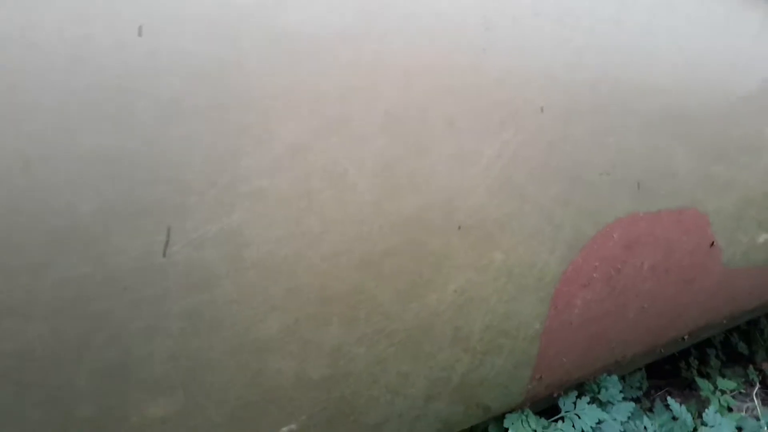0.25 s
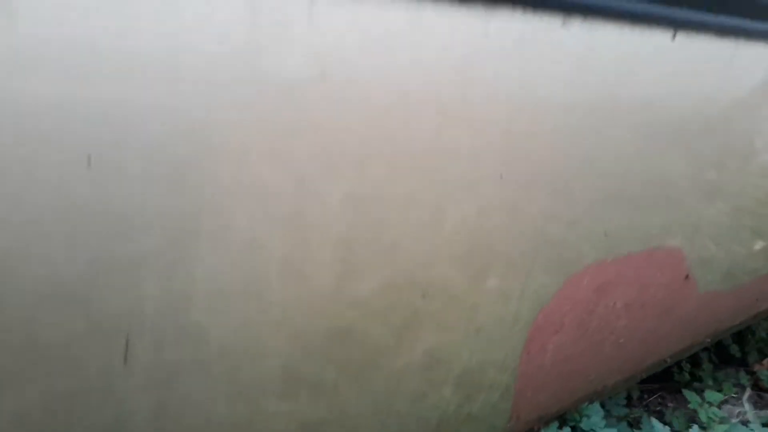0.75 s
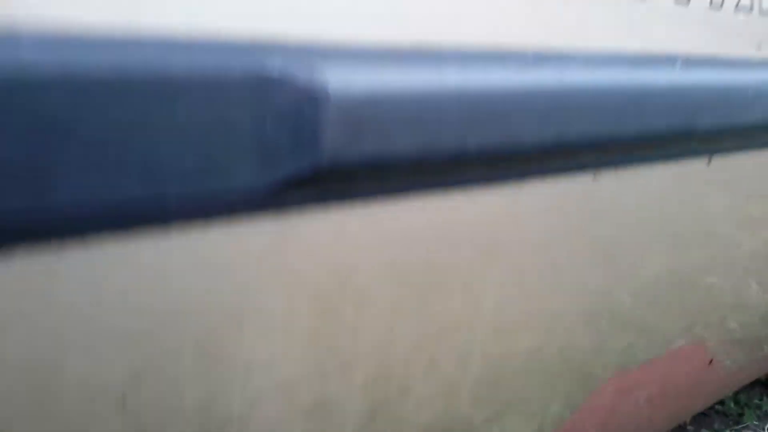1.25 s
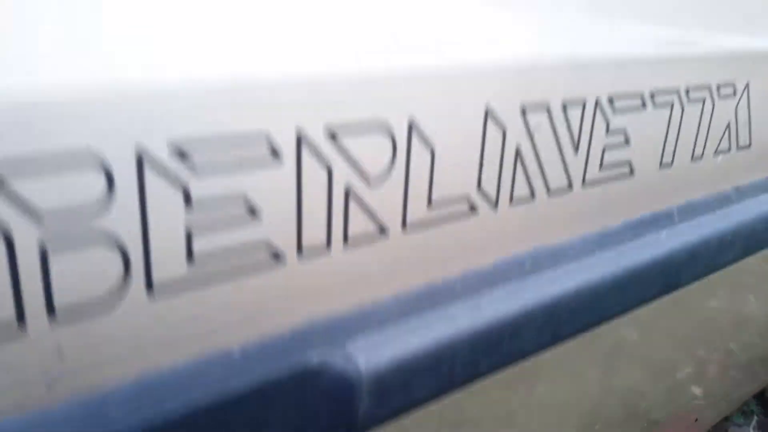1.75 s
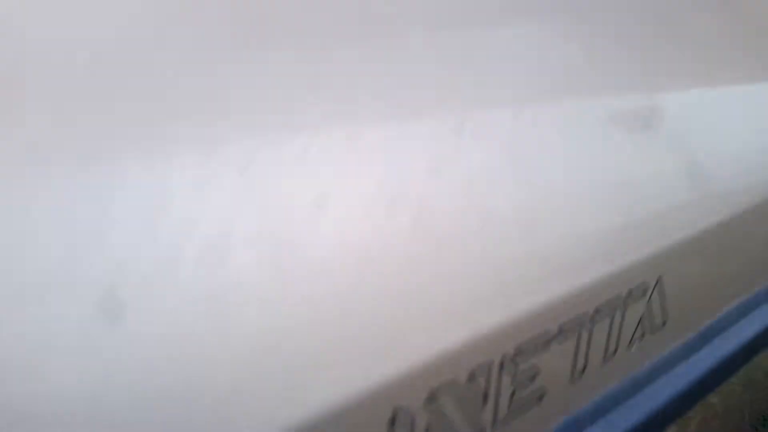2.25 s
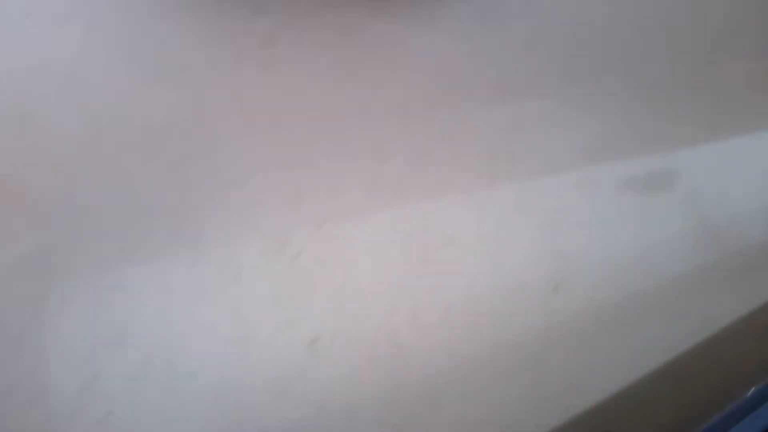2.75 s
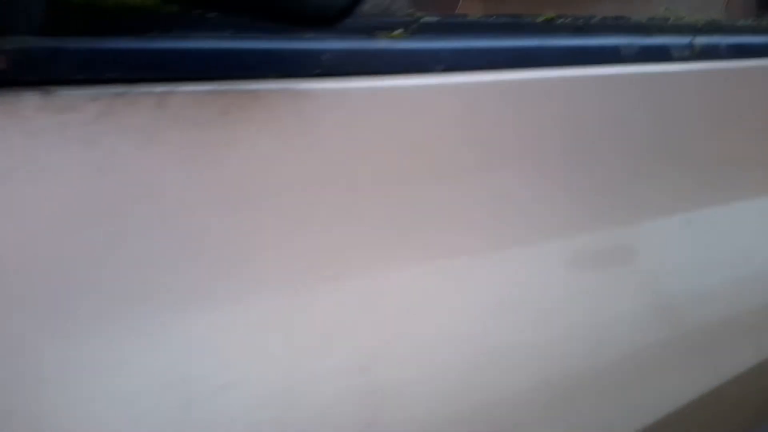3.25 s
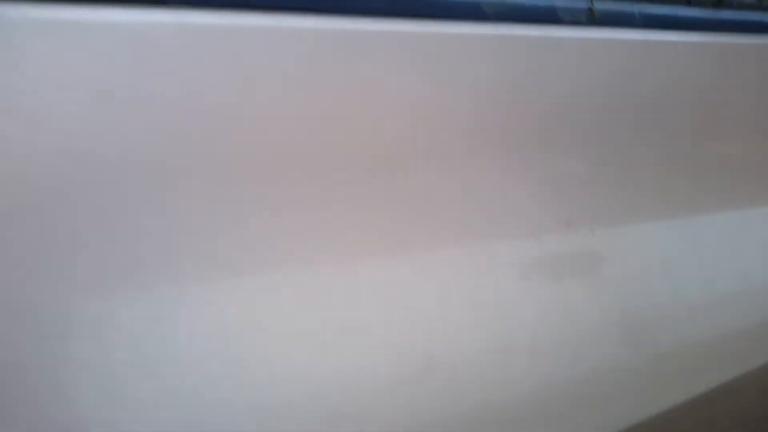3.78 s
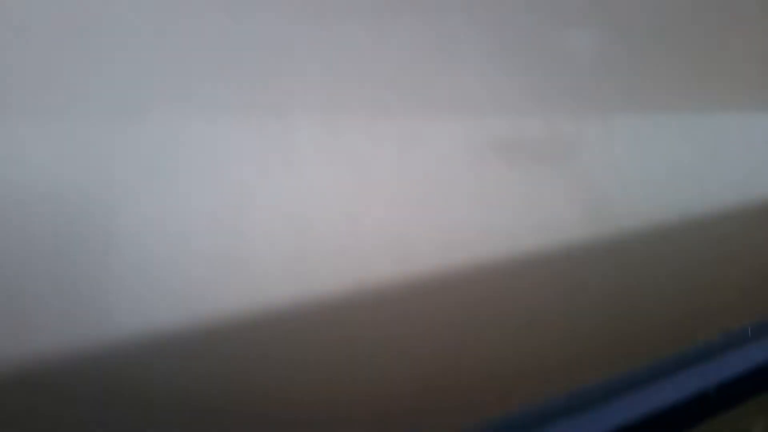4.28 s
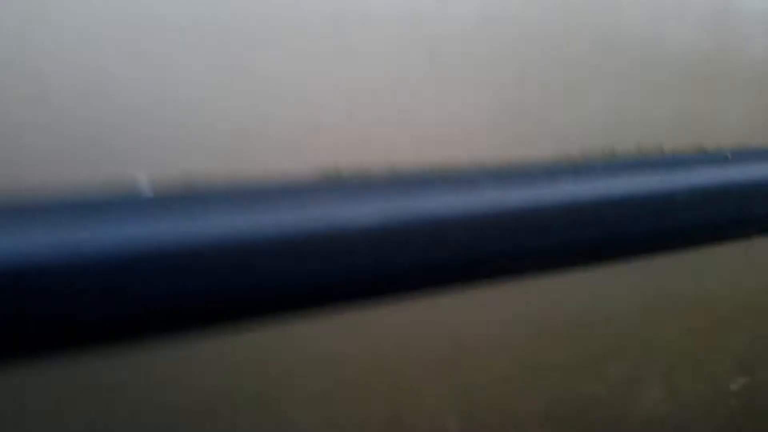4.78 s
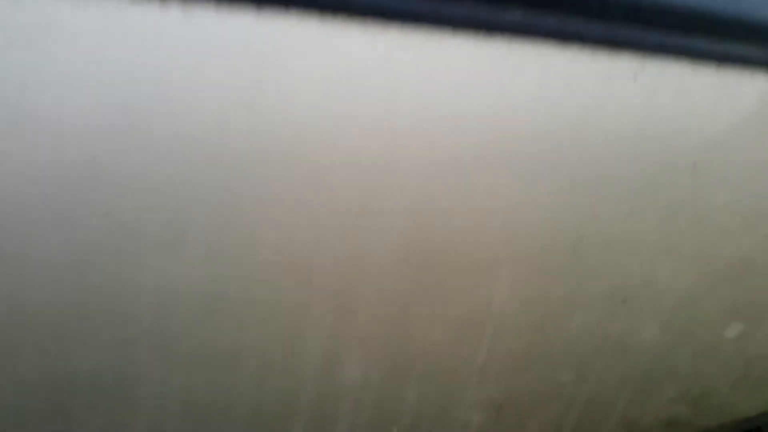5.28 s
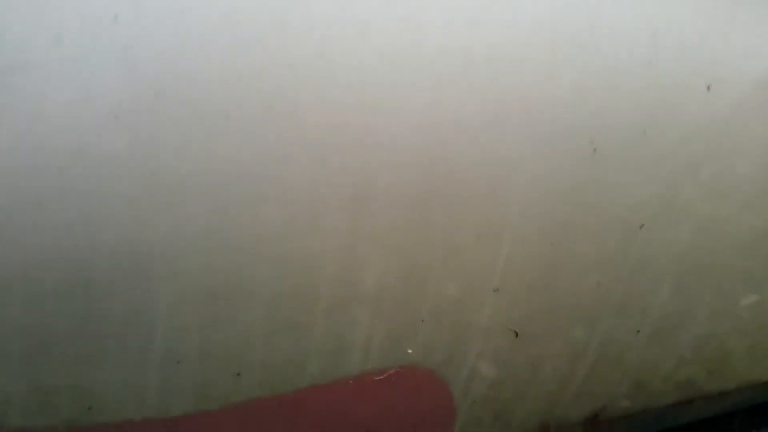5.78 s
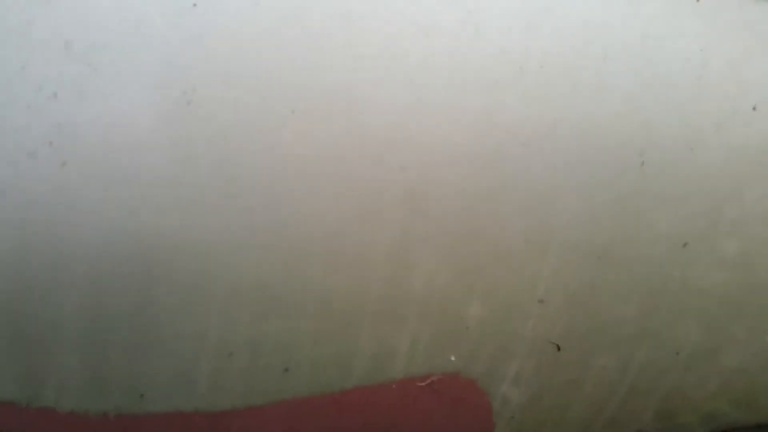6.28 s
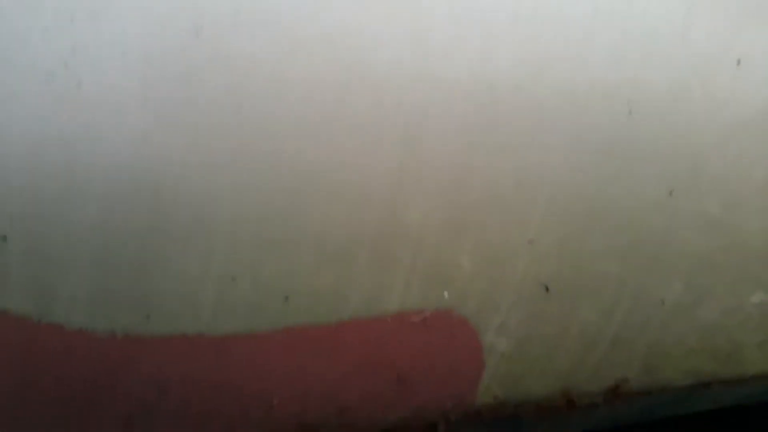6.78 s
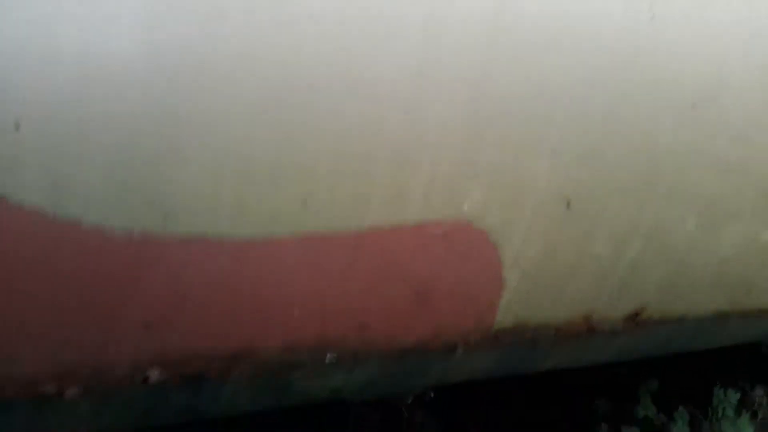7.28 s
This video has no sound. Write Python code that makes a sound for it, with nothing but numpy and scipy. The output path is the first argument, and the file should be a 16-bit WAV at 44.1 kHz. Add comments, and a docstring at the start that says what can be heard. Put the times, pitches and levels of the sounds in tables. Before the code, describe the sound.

Dry leaves crackle and twigs snap under someone's shifting feet outdoors, with one dense, loud crunch after the middle and quiet at both ends.

```python
"""Dry leaf litter crackles under someone's shifting feet, heard through a phone with one microphone.
The leaves are thousands of tiny noise bursts; each snapping twig is a sharp click with fading splinters.
Soles scuff the soil: lumpy noise through resonances, plus single thuds; a low rumble comes and goes.
Behind them are a shaped noise of distant traffic and hiss and a thin electronic tone.
The microphone port lifts the leaves and snaps near 4.7 kHz."""
import sys
import numpy as np
from scipy import signal
from scipy.fft import rfft, irfft
from scipy.io import wavfile
from scipy.ndimage import uniform_filter1d

SR = 44100
rng = np.random.default_rng(int(sys.argv[2]) if len(sys.argv) > 2 else 0)


def dump_mix(stems):
    """Bounce the given channels to the path in sys.argv[1] as a 16-bit WAV at rate SR."""
    frames = np.atleast_2d(stems).T  # one column per channel
    limited = np.clip(frames, -1, 1)  # hard clip at full scale
    pcm = np.round(limited * 32767).astype(np.int16)
    wavfile.write(sys.argv[1], SR, pcm)


N = 332073  # length in samples, about 7.5 s


def leaves(crackle_db, crisp_db, stems_db):
    """Leaves break as dense, patchy grains; all sizes break together, each with its own level."""
    patch = undb(0.82 * walk(40) + 1.4 * walk(90))
    crackle = patch * grains(450., 3.8, 0.0012, 2.9)
    body, middle, top = sizes(crackle)
    stems = unit(body) * undb(stems_db + 1.3 * walk(30))
    crisp_edges = unit(top) * undb(crisp_db + 0.76 * walk(30))
    return stems + unit(middle) * undb(crackle_db) + crisp_edges


def crushes(column):
    """A sole or toe crushes a patch: loudness climbs and drops in dB; the power of all crushes adds up."""
    # crushed patches: peak time [t/s], crackle [level/dB], rise [t/s], fall [t/s],
    # crisp edges relative to crackle [level/dB], soil relative to crackle [level/dB]
    crush_rows = [(1.24, -61, 0.17, .1, -7, -5), (1.545, -47.5, 0.058, 0.089, -7, -30),
                  (1.65, -47, 0.062, 0.094, -1, -27), (1.815, -63, .04, .05, 17, -8),
                  (1.99, -46, 0.038, 0.076, -10, -12), (2.11, -41.5, 0.069, 0.039, -6, -18),
                  (2.235, -39, .03, .2, -6.5, -13), (2.3, -30.5, 0.096, 0.19, -12, -19.5),
                  (2.39, -46.5, 0.06, .15, 0, -7), (2.531, -32.5, 0.16, 0.084, -9, -15.5),
                  (2.759, -50, 0.051, 0.26, -5, -7.5), (3.06, -47.5, .15, 0.057, -11, -7),
                  (3.23, -41.5, 0.12, 0.039, -8, -15), (3.36, -49.5, .15, .12, -14, -7),
                  (3.67, -41, 0.16, 0.54, -10.5, -16), (3.99, -44.5, 0.13, 0.3, -9, -13.5),
                  (4.491, -44.5, 0.15, .1, -11, -16), (4.545, -37.5, 0.061, 0.22, -6.5, -14),
                  (4.592, -28.5, 0.058, 0.14, -9.5, -11.5), (4.66, -27, 0.062, 0.13, -9.5, -26),
                  (4.757, -22, 0.14, 0.083, -9, -19), (4.84, -33.5, 0.035, 0.23, -12, -17),
                  (4.94, -44.5, 0.044, 0.11, 0.5, 0), (5.059, -39.5, 0.067, 0.021, -10, -5),
                  (5.22, -40, 0.012, 0.12, -7, -2.5), (5.268, -53.5, 0.079, 0.06, -1, 9),
                  (5.37, -48, 0.17, 0.076, -9, -9), (5.52, -49.5, 0.071, 0.09, -3, -19),
                  (5.61, -39, 0.048, 0.092, -10, -6), (5.68, -48.5, 0.12, 0.078, -7, 5),
                  (5.97, -43.5, 0.043, 0.09, -9, -10.5), (6.57, -61, 0.055, 0.044, -14, -19),
                  (6.94, -60.5, 0.17, 0.053, -12, -19), (7.09, -50, 0.081, 0.09, -7.5, -13),
                  (7.283, -44, 0.012, 0.092, -7, -3.5), (7.41, -55, 0.085, 0.15, -5.5, -7)]
    swell_db = 20  # climb within the rise time, drop within the fall time
    t = np.arange(N) / SR
    power = np.zeros(N)
    for row in crush_rows:
        s, db, rise, fall = row[:4]
        shift_db = row[column] if column else 0  # column 0 means the plain crackle
        before = (s - t) / max(rise, .005)
        after = (t - s) / max(fall, .005)
        away = np.where(t < s, before, after)
        power += undb(db + shift_db - swell_db * np.minimum(away, 6)) ** 2
    return power


def grains(rate, spread_db, tail_s, bed):
    """Random breaks of uneven size (rate per s), noise that starts sharply and dies fast, over a soft bed."""
    chance = rng.random(N)
    big = rng.exponential(size=N)
    hits = (chance < rate / SR) * undb(spread_db * np.minimum(big, 5.))
    swell = signal.lfilter([1], [1, -np.exp(-1 / (tail_s * SR))], hits)
    return unit((unit(swell) + bed) * rng.standard_normal(N))


def sizes(x):
    """Small pieces sound higher: split into body, middle and crisp top, as heard through the port."""
    body_hz, crisp_hz, thin_hz = 2780, 8000, 11800  # two borders; the top thins out above the last
    f = np.fft.rfftfreq(len(x), 1 / SR)
    low = 1 / (1 + (f / body_hz) ** 6)
    high = 1 - 1 / (1 + (f / crisp_hz) ** 8)
    floor = 1 - 1 / (1 + (f / 790.0) ** 4)  # takes the bass out of the body
    roof = 1 / np.sqrt(1 + (f / thin_hz) ** 2)
    spectrum = rfft(port(x))
    shares = (low * floor, 1 - low - high, high * roof)
    return (irfft(spectrum * share, len(x)) for share in shares)


def port(x):
    """The small tube in front of the microphone resonates."""
    port_hz, width_hz, lift_db = 4700, 1020, 15
    b, a = signal.iirpeak(port_hz, port_hz / width_hz, SR)
    return x + undb(lift_db) * signal.lfilter(b, a, x)


def twigs():
    """Twigs and leaves snap at set moments."""
    # snaps: time [t/s], peak of the middle part [level/dB], body relative to it [level/dB],
    # crisp top relative to it [level/dB], splinter peaks relative to the break [level/dB]
    snap_rows = [(0.3861, -44, -25, -12, -22), (0.584, -54, -1, 1, -3), (0.8896, -55, -12, -17, -19),
                 (0.9778, -51, -25, -11, -9), (1.479, -41.5, -7, 0, -8), (1.5121, -35, -22, -2, -15),
                 (1.5929, -30.5, -30, -15, -10), (1.7867, -33.5, -21, 12, -27), (1.8066, -36, -24, 9, -12),
                 (1.823, -47, -22, 4, -20), (1.8351, -33.5, -33, 7, -30), (1.9299, -42, -16, -4, -18),
                 (1.9842, -31.5, -24, -2, -2), (2.102, -29.5, -11, -10, 2), (2.1182, -26, -13, -12, -18),
                 (2.169, -29.5, -7, 1, -9.5), (2.221, -26, -5.5, -1, -10), (2.48, -28.5, -20, -4, -4),
                 (2.5258, -23.5, -25, -10, -5), (2.6438, -21, -12, 2, -18), (2.7437, -20.5, -11, -6, -16),
                 (2.7662, -26.5, -9, -9, -18), (2.8031, -32, -8, -15, -9), (2.8926, -32.5, -17, -18, -4),
                 (2.9105, -29, -11, -26, -22), (2.9929, -28.5, -2.5, 0, -18), (3.1363, -5, -29, -4, -22),
                 (3.235, -21, -26, -3, -15), (3.6435, -25.5, -21, -12, -27), (3.6684, -28, -23, -16, -17),
                 (3.7931, -31.5, -8, -16, -11), (3.87, -34.5, -15, -3, -7), (3.936, -36, -16, 1, -6),
                 (3.962, -27, -29, -8, -25), (4.001, -23.5, -34, -22, -34), (4.065, -24.5, -22, -19, -29),
                 (4.1413, -29, -16, 2, -25), (4.3786, -44, -33, -9, -30), (4.538, -31, -30, -10, -12),
                 (4.588, -11.5, -12, -19, -24), (4.6665, -14, -13.5, -22, 4), (4.7527, -8, -36, -27, -1),
                 (4.9336, -17, -13, -12, -21), (4.941, -17, -8.5, -16, -15), (4.9674, -22.5, -9, -4, -14.5),
                 (5.0463, -27, -18, 1, -16), (5.1317, -34, -2, -9, -8), (5.1506, -31.5, -7, -13, -13),
                 (5.1714, -33, -16, -31, -5), (5.2096, -25.5, -5, 4.5, -6), (5.2178, -25, -30, 3, -15),
                 (5.2306, -23.5, -8, -30, -20), (5.443, -32, -19.5, -11, -24), (5.5137, -41, -5, 8, -9),
                 (5.579, -33, -10, 4, -10), (5.595, -17, -17, 4.5, -10.5), (5.7452, -31, -10, 6, -15),
                 (5.9564, -25, -10, -8, -4), (5.9624, -25.5, -9, -12, -4.5), (6.0156, -27, -9, -6, -14),
                 (6.0344, -39, -2, 1, -15), (6.2158, -38, -31, -1, -14), (6.2782, -45.5, -7, 4, -22),
                 (6.3683, -54, -16, -22, -16), (6.4061, -49.5, -10, -5, -6), (6.5236, -46, -12, -15, -9),
                 (6.8148, -39, -6, -5, -10), (6.8671, -45, -16, -13, -14), (6.9588, -39, -14, -35, -17),
                 (7.0188, -33, -27, 3.5, -20), (7.0797, -37, -15, -14, -10), (7.1031, -31, -26, -24, -25),
                 (7.1502, -36.5, -18, -13, -22), (7.2256, -39.5, -10, -20, -11),
                 (7.28, -16.5, -7.5, -6.5, -11), (7.2861, -18, -24, 2, -31), (7.3, -29, -27, -6, -8),
                 (7.321, -25.5, -24, -22, -37), (7.355, -33, -14, -16, -29), (7.3846, -30.5, -7, -20, -24),
                 (7.4207, -41.5, -10, 6, -8)]
    return snaps(snap_rows)


def ticks(stir_db):
    """Small breaks at random moments, louder when the stir around them is louder."""
    ticks_per_s, scatter_db = 7, 4.5
    mean_db = [12, -41, -14, -4]  # peak relative to the stir, then body, top and splinters as for twigs
    chance = rng.standard_normal((int(ticks_per_s * N / SR), 4))
    s = .01 + rng.random(len(chance)) * (N / SR - .02)
    rows = np.column_stack([s, mean_db + scatter_db * chance])
    rows[:, 1] += stir_db[(s * SR).astype(int)]
    return snaps(rows)


def snaps(rows):
    """Each snap is a sharp break, one single click, then a hiss of splinters that fades."""
    splinter_t60_s = 0.032  # time to fade by 60 dB
    crest_db = 5  # peaks of the splinter hiss over its rms
    lead = 64  # samples of room ahead of the break
    out = np.zeros(N + SR)
    t = np.arange(4096) / SR
    noise = rng.standard_normal((len(rows), len(t)))
    fade = np.exp(-np.log(1000) * t / splinter_t60_s)
    for (s, peak_db, body_db, top_db, splinter_db), hiss in zip(rows, noise):
        burst = undb(splinter_db - crest_db) * hiss * fade
        burst[0] += 1  # the break itself
        body, middle, top = sizes(np.roll(burst, lead))
        middle = band(middle, 3100.0, 8400.0, order=1)  # the broken piece flexes for a few cycles
        body, middle, top = (part / np.abs(part).max() for part in (body, middle, top))
        i = int(s * SR) - lead
        out[i:i + len(t)] += undb(peak_db) * (middle + undb(body_db) * body + undb(top_db) * top)
    return out[:N]


def soles(scuff_db, rumble_db):
    """Lumpy scuffing of the soil and a few single thuds, over a low rumble that comes and goes."""
    # hollow litter rings when scuffed: resonance [f/Hz], width [f/Hz], strength [level/dB]
    soil_peaks = [(355, 260, 1.5), (548, 220, -1), (786, 180, -2), (1124, 66, -16)]
    # low rumble: resonance [f/Hz], width [f/Hz], strength [level/dB]
    rumble_peaks = [(68, 16, -1.5), (95.5, 66, 3.5), (156, 42, -10), (185, 49, -11)]
    # heel and toe thuds: time [t/s], peak before the bass cut [level/dB], pitch [f/Hz], 60 dB fade [t/s]
    thud_rows = [(2.087, -44, 98, 0.086), (2.192, -36.5, 173, 0.046), (2.236, -40.5, 553, 0.1),
                 (2.366, -40, 231, 0.17), (2.399, -35, 260, 0.032), (2.542, -41, 208, 0.099),
                 (2.645, -38, 203, 0.053), (4.586, -22.5, 250, 0.036), (4.59, -30, 105, 0.06),
                 (4.643, -36, 179, 0.033), (4.878, -43, 105, 0.069), (5.031, -43, 189, 0.22),
                 (5.079, -44, 192, 0.093), (5.263, -36.5, 186, 0.13), (5.284, -46, 185, 0.1),
                 (5.602, -35, 186, 0.042), (5.614, -37, 180, 0.064), (5.629, -33.5, 173, 0.07),
                 (5.648, -36, 584, 0.071), (5.658, -38, 613, 0.1), (5.691, -39, 101, 0.076),
                 (6.013, -44.5, 817, 0.058), (7.279, -41, 97, 0.11)]
    thud_rise_s = 0.00043  # the thuds start almost at once
    bass_cut_hz = 44  # the small microphone loses the deepest part of near thuds
    scuff = ring(grains(300., 1.6, 0.0099, 0.94), soil_peaks)
    rumble = ring(grains(60., 1.5, 0.03, 0.85), rumble_peaks)
    out = undb(scuff_db) * unit(band(scuff, 232.0, 1360.0, order=4))
    out += undb(rumble_db) * unit(band(rumble, 40.0, 340.0))
    t = np.arange(N) / SR
    for s, peak_db, hz, t60 in thud_rows:
        age = np.clip(t - s, 0, None)
        rise = 1 - np.exp(-age / thud_rise_s)
        swell = rise * np.exp(-np.log(1000) * age / max(t60, .005))
        out += undb(peak_db) * np.sin(2 * np.pi * hz * age) * swell / swell.max()
    return signal.sosfilt(signal.butter(2, bass_cut_hz, "highpass", fs=SR, output="sos"), out)


def far():
    """Distant traffic hum and hiss from shaped noise; the hum wavers, a thin electronic tone holds still."""
    # spectrum of hum and hiss: frequency [f/Hz], relative strength [level/dB]
    spectrum_points = [(18, -52), (30, -18), (91, 4.5), (198, -19.5), (453, -19), (865, -19), (1380, -19.5),
                       (2500, -28.5), (4650, -27.5), (8640, -30), (9840, -27), (14500, -27.5)]
    # thin steady tone of the electronics: pitch [f/Hz], rms [level/dB]
    whine_tones = [(9647, -76)]
    far_db = -62  # rms of hum and hiss before the hum wavers
    hz, db = np.transpose(spectrum_points)
    f = np.fft.rfftfreq(N, 1 / SR)
    shape = undb(np.interp(np.log(f + 1), np.log(hz), db))
    bed = unit(irfft(rfft(rng.standard_normal(N)) * shape, N))
    hum = band(bed, 30., 900.0)
    bed = bed + hum * (undb(4.1 * walk(3.15)) - 1)
    t = np.arange(N) / SR
    whine = sum(undb(db) * np.sqrt(2) * np.sin(2 * np.pi * hz * t) for hz, db in whine_tones)
    return undb(far_db) * bed + whine


def undb(db):
    """Gain of a dB value."""
    return 10 ** (np.asarray(db) / 20)


def unit(x):
    """Scale to rms 1."""
    return x / np.sqrt(np.mean(x ** 2))


def together(db, power):
    """Level in dB of a bed and added power."""
    return 10 * np.log10(undb(db) ** 2 + power)


def band(x, lo_hz, hi_hz, order=2):
    """Keep only the frequencies between two borders."""
    return signal.sosfilt(signal.butter(order, [lo_hz, min(hi_hz, .45 * SR)], "bandpass", fs=SR, output="sos"), x)


def ring(x, peaks):
    """Sum of resonances, each a narrow filter that rings at its own pitch."""
    return sum(undb(db) * signal.lfilter(*signal.iirpeak(hz, hz / width, SR), x) for hz, width, db in peaks)


def walk(rate):
    """Random levels held 1 / rate s and smoothed twice; spread near 1."""
    k = int(SR / rate)
    steps = np.repeat(rng.standard_normal(N // k + 1), k)
    return 1.04 * uniform_filter1d(uniform_filter1d(steps, k), k)[:N]


def scene():
    """Stir and crushes drive every grain size; one microphone, the same on both channels."""
    # restless shifting of the feet: time [t/s], leaf stir [level/dB], crisp edges relative to stir
    # [level/dB], stems relative to stir [level/dB], low rumble [level/dB]
    stir_rows = [(0, -68.5, -3, -3, -55), (0.55, -71.5, -2, -0.5, -58), (1.03, -66.5, -5, -7, -59.5),
                 (1.35, -65, -5, -7, -59.5), (1.49, -60, -2, -7, -51.5), (1.53, -52, -2, -19, -57.5),
                 (1.75, -50.5, -4.5, -16.5, -54), (1.95, -52, -7.5, -8.5, -56),
                 (2.2, -46, -6.5, -13, -52.5), (2.6, -46, -10, -10.5, -52), (2.9, -54.5, -8, -7.5, -53.5),
                 (3.15, -47.5, -6.5, -11.5, -53.5), (3.4, -48.5, -14, -7, -52.5),
                 (3.47, -57.5, -6, -7, -54), (3.6, -53, -4.5, -12, -55), (3.9, -53, -11, -12, -52.5),
                 (4.42, -50, -7, -10.5, -56), (5.05, -52.5, -7, -5.5, -53),
                 (5.42, -56.5, -5.5, -6.5, -53.5), (5.75, -62, -1, -3, -58.5), (6.14, -68.5, -4, -4, -62),
                 (6.6, -69, -4, -4, -62), (7.0, -64, -4, -6, -59), (7.53, -70, -3, -2, -55)]
    pivot_db = -50  # reference level for the two rules below
    stems_at_pivot_db, stems_slope = -61, 0.89  # stems of a crush; dB gained per dB of crackle
    soil_at_pivot_db, soil_slope = -58.5, 0.55  # scuffed soil; dB gained per dB of stir
    crush_rumble_db = -4.5  # low rumble of a crush relative to its soil
    s, *columns = np.transpose(stir_rows)
    stir_db, edge_db, stem_db, low_db = (np.interp(np.arange(N) / SR, s, c) for c in columns)
    crunch = crushes(0)
    crackle_db = together(stir_db, crunch)
    crisp_db = together(stir_db + edge_db, crushes(4))
    crushed_stems = undb(stems_at_pivot_db) ** 2 * (crunch / undb(pivot_db) ** 2) ** stems_slope
    stems_db = together(stir_db + stem_db, crushed_stems)
    soil = crushes(5)
    scuff_db = together(soil_at_pivot_db + soil_slope * (stir_db - pivot_db), soil)
    rumble_db = together(low_db, soil * undb(crush_rumble_db) ** 2)
    mono = leaves(crackle_db, crisp_db, stems_db)
    mono = mono + twigs() + ticks(stir_db)
    mono = mono + soles(scuff_db, rumble_db) + far()
    return np.array([mono, mono])


def record(dry):
    """The recorder drops the top in a first step, then cuts it steeply."""
    edge_hz, top_hz = 14550, 15500
    step = signal.sosfilt(signal.ellip(6, .3, 32, edge_hz, fs=SR, output="sos"), dry)
    return signal.sosfilt(signal.ellip(10, .2, 70, top_hz, fs=SR, output="sos"), step)


dry = scene()
out = record(dry)
dump_mix(out)
```